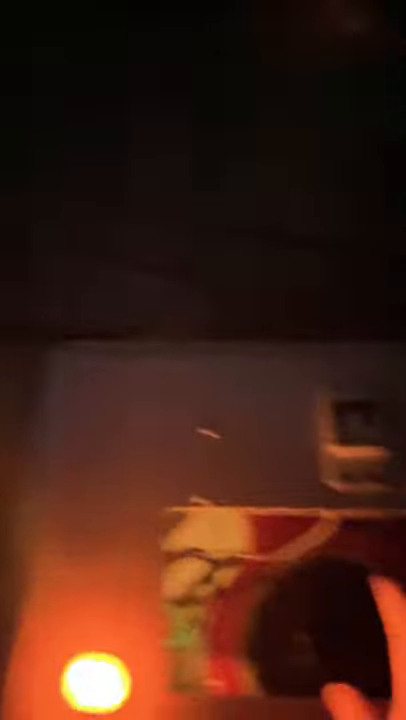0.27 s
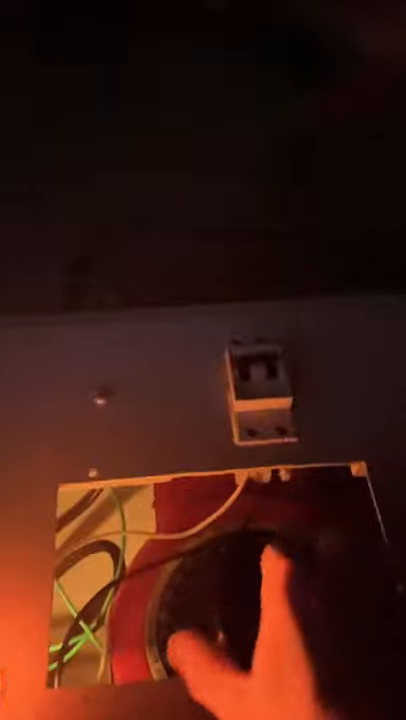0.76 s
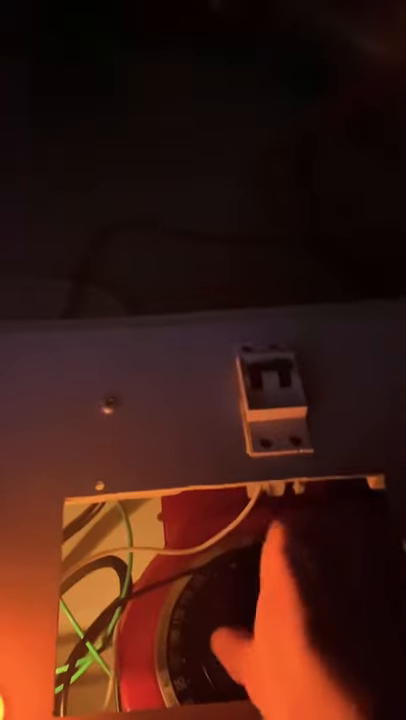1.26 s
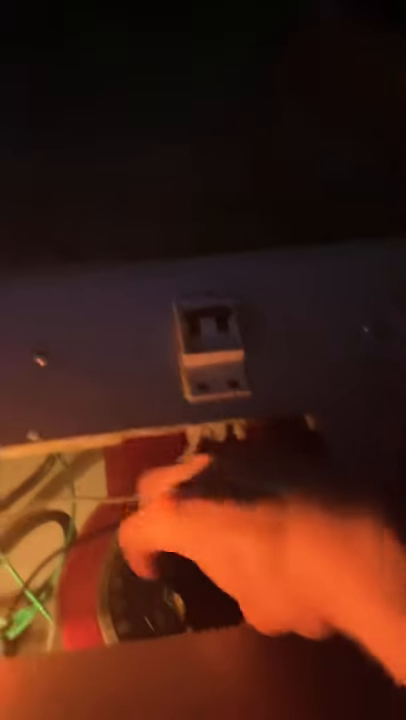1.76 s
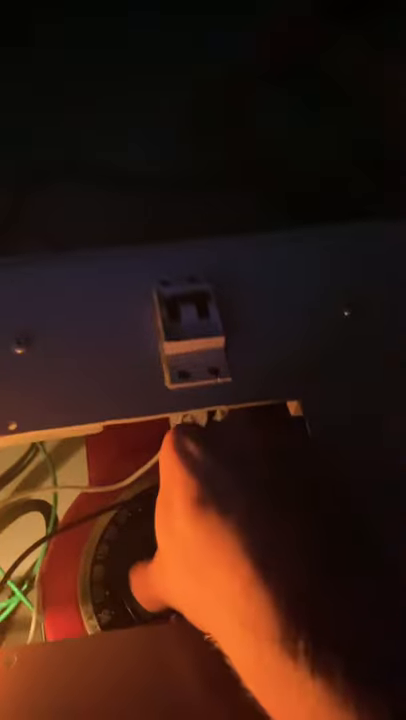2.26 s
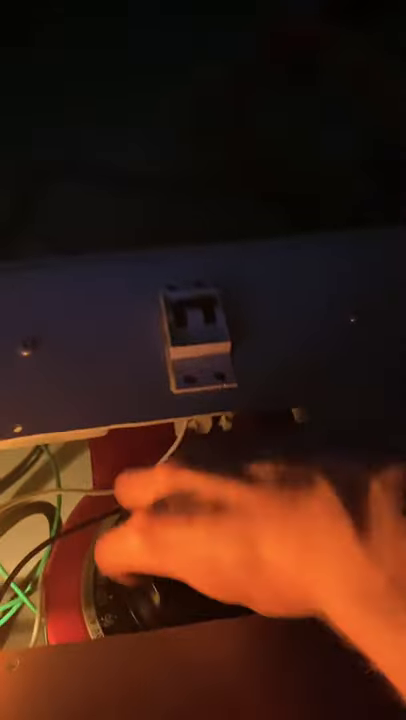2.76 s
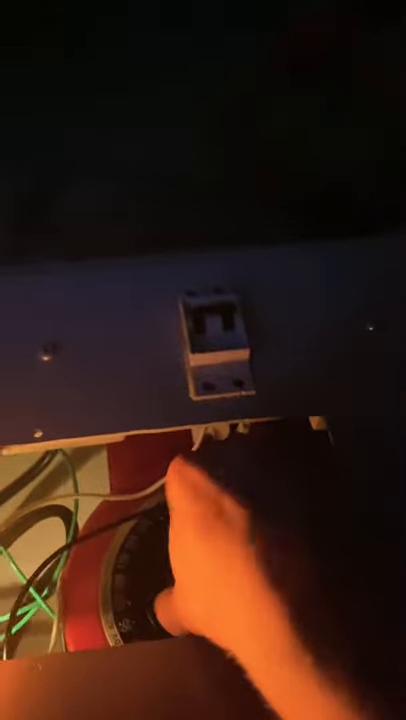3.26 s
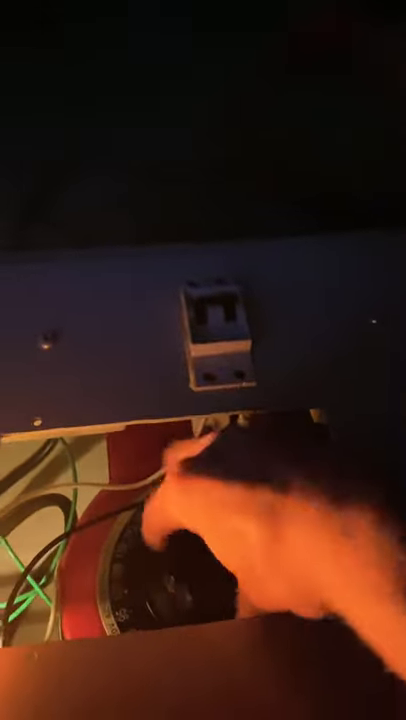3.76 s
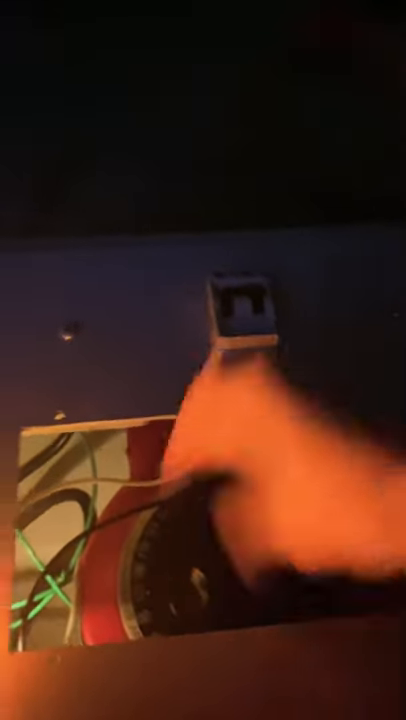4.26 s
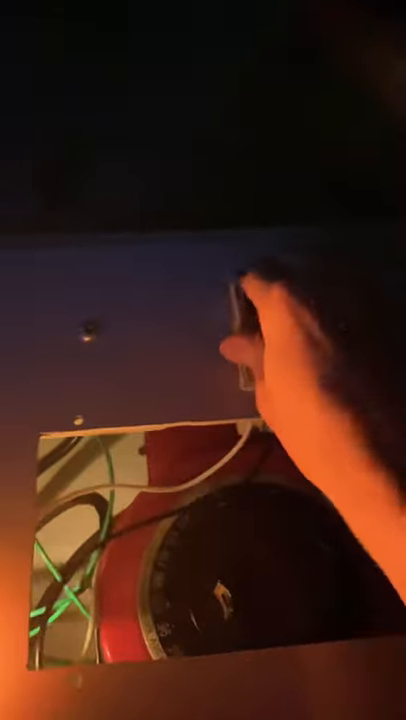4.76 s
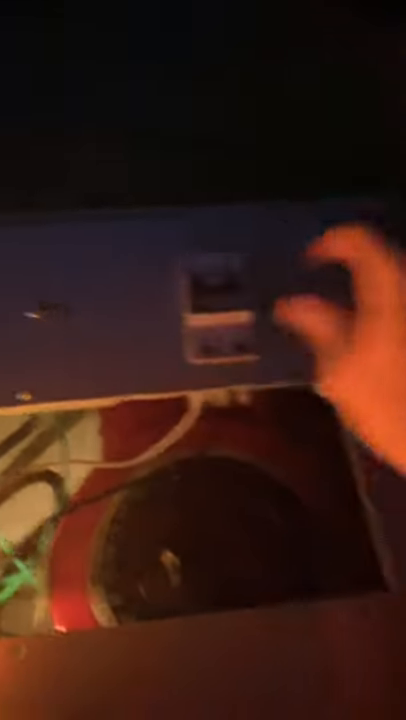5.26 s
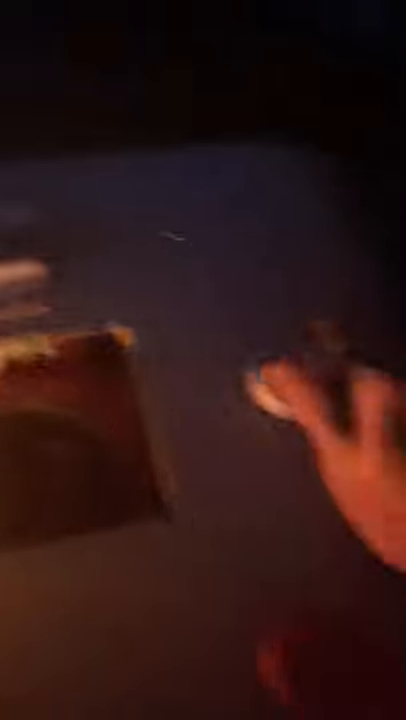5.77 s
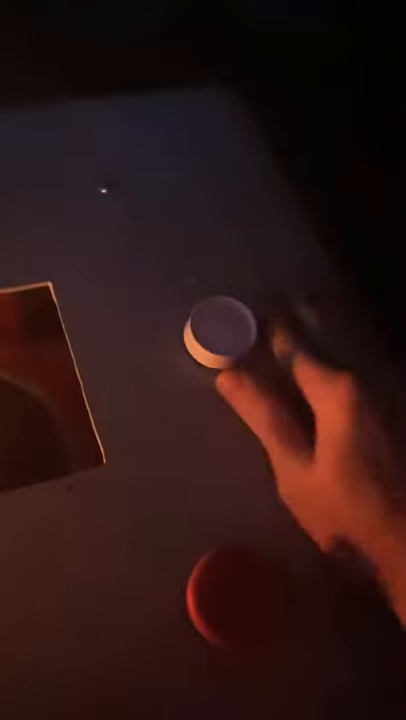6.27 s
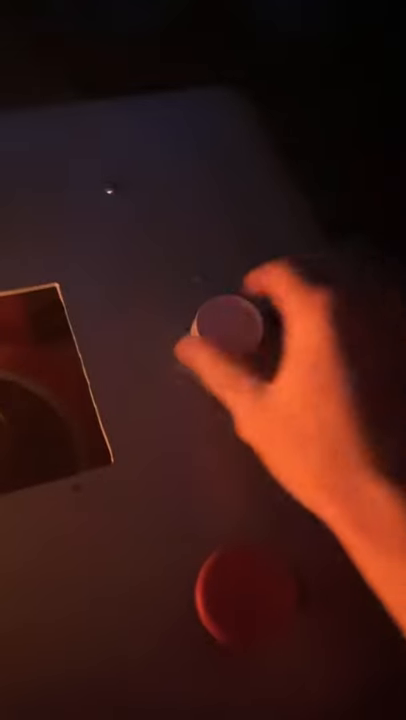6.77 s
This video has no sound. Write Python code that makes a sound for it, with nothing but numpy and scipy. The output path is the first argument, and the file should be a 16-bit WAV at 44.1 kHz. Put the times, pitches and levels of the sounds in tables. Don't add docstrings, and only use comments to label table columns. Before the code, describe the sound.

From 0 s a high-voltage spark gap across a walled night yard roars in a dense, harsh, bright buzz, roughly three hundred ragged cracks a second, with a ringing, lumpy outdoor reverberation. From about 1.3 s it slows, and by 2.4 s it is a coarse mains-rate rattle. Between 2.6 and 3.3 s separate cracks emerge, growing harder and more widely spaced, the loudest last ones near 3.5 s; a faint low fizzle ends it at 3.74 s. The tail dies away, uncovering a much quieter cooling blower, a steady mid-low whine with rushing air, and faint distant wash. A bright plastic click comes at 3.9 s, a soft touch at 4.75 s, a sharp breaker snap at 4.9 s. At 6.2 s a dull button click cuts the blower: its pitch and hiss sink, with soft box knocks at 6.46 and 6.75 s and a faint low shudder.

```python
import sys
import numpy as np
from scipy import signal
from scipy.fft import rfft, irfft, next_fast_len
from scipy.io import wavfile
from scipy.ndimage import uniform_filter1d

SR = 44100
rng = np.random.default_rng(int(sys.argv[2]) if len(sys.argv) > 2 else 0)


def voltage_ratio(level):
    return 10 ** (np.asarray(level, float) / 20)


def generate_wav(sig):
    pcm = np.round(np.clip(np.atleast_2d(sig).T, -1, 1) * 32767).astype(np.int16)
    wavfile.write(sys.argv[1], SR, pcm)


N = 309141
TIME_S = np.arange(N) / SR
HZ = np.fft.rfftfreq(next_fast_len(N + 8000), 1 / SR)
PORT_SIGN = np.array([[1], [-1]])
# freq_hz, likeness
YARD_LIKENESS = [(120, .3), (300, .7), (500, .7), (900, -.5), (1900, .9), (3000, 0), (5000, .4),
                 (5900, .55), (6400, .93), (6900, .98), (8100, .97), (9000, .3), (9700, .97), (11300, .97),
                 (11900, .55), (12500, .92), (13000, .985), (14400, .985), (15000, .4), (15600, .9)]


def evened(x):
    return x / np.sqrt(np.mean(x ** 2) + 1e-20)


def read(points, hz):
    f, value = np.transpose(points)
    return np.interp(np.log(hz + 1), np.log(f + 1), value)


def curves(rows):
    s, *columns = np.transpose(rows)
    return [np.interp(TIME_S, s, c) for c in columns]


def humps(rows, hz):
    return sum(db / (1 + (2 * (hz - f) / width_hz) ** 2) for f, width_hz, db in rows)


def spectrum(x):
    return rfft(x, 2 * len(HZ) - 2)


def filtered(x, gain):
    return irfft(spectrum(x) * gain)[..., :N]


def lowpass(corner_hz, order):
    return 1 / (1 + (HZ / corner_hz) ** order)


def highpass(corner_hz, order):
    return 1 / (1 + (corner_hz / (HZ + 1)) ** order)


def delay(s):
    return np.exp(-2j * np.pi * HZ * s)


def pair(noise):
    same = np.clip(read(YARD_LIKENESS, HZ), 0, 1)
    right = filtered(noise[0], same) + filtered(noise[1], np.sqrt(1 - same ** 2))
    return np.array([noise[0], right])


def held(recover_s):
    quiet_from_s = 3.5
    return np.exp(-(np.clip(TIME_S - quiet_from_s, 0, None) / recover_s) ** 2)


def firings():
    # time_s, firings_per_s, crack_db
    buzz = [(0, 297, -24), (.12, 325, -25.5), (.5, 306, -26), (1, 304, -26), (1.15, 280, -25),
            (1.3, 270, -26.5), (1.6, 260, -28), (2, 238, -28), (2.3, 195, -26), (2.415, 168, -25.5)]
    # time_s, crack_db
    thinning = [(2.4247, -25), (2.435, -24), (2.4431, -24), (2.453, -24.5), (2.4663, -26.5), (2.4769, -25),
                (2.4839, -26), (2.4926, -27.5), (2.5036, -26), (2.5164, -25), (2.5274, -24.5),
                (2.5348, -28), (2.5428, -26.5), (2.5501, -26), (2.5584, -26.5), (2.5668, -26.5),
                (2.5833, -24.5), (2.5999, -25.5)]
    # time_s, crack_db
    singles = [(2.6101, -27), (2.6248, -24.5), (2.6422, -24), (2.6589, -27), (2.6677, -26), (2.678, -27),
               (2.6914, -26), (2.6953, -27), (2.7096, -25), (2.7248, -28.5), (2.7288, -28), (2.7407, -24.5),
               (2.7444, -26), (2.7583, -27), (2.7681, -25.5), (2.7852, -22.5), (2.8022, -23.5),
               (2.8187, -23.5), (2.8334, -23), (2.8513, -22.5), (2.8676, -26), (2.8852, -23.5),
               (2.9006, -24.5), (2.9104, -26.5), (2.9336, -24), (2.9438, -24.5), (2.9606, -25.5),
               (2.9758, -24), (2.9854, -29), (3.0, -26.5), (3.0096, -30), (3.0267, -23), (3.0421, -24),
               (3.0518, -26), (3.0673, -24.5), (3.0842, -24), (3.0941, -26), (3.1106, -23), (3.125, -23.5),
               (3.1431, -22), (3.1587, -25), (3.1757, -23), (3.1944, -23), (3.2092, -24.5), (3.2269, -21),
               (3.2418, -22.5), (3.2584, -22.5), (3.2686, -23.5), (3.2994, -18.5), (3.3189, -21),
               (3.3498, -19), (3.3834, -20), (3.3931, -25), (3.4104, -20.5), (3.4502, -17), (3.4611, -20.5),
               (3.5008, -16.8), (3.5358, -16.4), (3.5855, -15.5)]
    # time_s, crack_db
    restrikes = [
        (3.3026, -24),
        (3.353, -23),
    ]
    # time_s, level_db
    thump_swell = [(2.42, -5.5), (2.6, -2.5), (2.85, -3), (2.95, 1), (3.2, 0.5), (3.6, -1)]
    mains_peaks_per_s, charge_start, charge_share = 119.96, -.25, .6
    gap_scatter = .25
    full_per_s, full_thump_db, thump_db_per_halving = 280, 1, 7
    single_trim_db, single_thump_db, thump_growth = -0.34, -4.5, 0.65

    per_s, crack_db = curves(buzz)
    thump_db = crack_db + full_thump_db + thump_db_per_halving * np.log2(full_per_s / per_s)
    phase = (TIME_S * mains_peaks_per_s - charge_start) % 1
    charging = np.sin(np.pi * np.clip(phase / charge_share, 0, 1)) * np.pi / 2 / charge_share
    charge = np.cumsum(per_s * charging) / SR
    breakdown, scatter = rng.standard_normal((1200, 2)).T
    at = np.searchsorted(charge, np.cumsum(np.clip(1 + gap_scatter * breakdown, .3, 2)))
    keep = at < buzz[-1][0] * SR
    at, size_db = at[keep], (scatter + 1.55 * breakdown)[keep]
    cracks, thumps = np.zeros((2, N))
    cracks[at] = voltage_ratio(crack_db[at] + size_db)
    thumps[at] = voltage_ratio(thump_db[at] + 3.3 * size_db)

    s, db = np.vstack([thinning, singles, restrikes]).T
    single = np.round(s * SR).astype(int)
    swell_db = curves(thump_swell)[0][single]
    cracks[single] = voltage_ratio(db + single_trim_db)
    thumps[single] = voltage_ratio(single_thump_db + thump_growth * (db + 19.5) + swell_db)
    return cracks, thumps


def sparks():
    # freq_hz, level_db_per_hz
    crack_spectrum = [(100, -63), (320, -8), (640, -11.5), (1200, -8), (2000, -8.5), (3400, -7.5),
                      (4800, -2.5), (7000, 3.5), (8200, 7.5), (10500, -3.5), (12000, -0.5), (13700, 7.5),
                      (15600, 2)]
    # freq_hz, width_hz, level_db
    gap_rings = [(9100, 330, -5.5), (9430, 120, 2.5), (10170, 470, 3.5), (12170, 300, 6.5),
                 (13700, 770, -4.5), (15500, 500, 0)]
    # freq_hz, level_db_per_hz
    thump_spectrum = [(25, -25), (45, -0.5), (80, 1), (160, -1), (320, -4), (640, -11), (1300, -4.5),
                      (2500, -16.5)]
    fizzle_s, fizzle_db = 3.7415, -17

    cracks, thumps = firings()
    t = np.arange(300) / SR
    shape = np.clip(t / 0.00025, 0, 1) * np.exp(-(t / 0.0016) ** 1.4) + 0.49 * np.exp(-t / 0.0039)
    envelope = np.sqrt(signal.oaconvolve(cracks ** 2, shape ** 2)[:N].clip(0))
    ragged = envelope * np.sign(rng.standard_normal(N))
    colour = evened(voltage_ratio(read(crack_spectrum, HZ) + humps(gap_rings, HZ)))
    fizzle = voltage_ratio(fizzle_db) * delay(fizzle_s) * lowpass(300, 4)
    pushes = irfft((spectrum(thumps) + fizzle) * voltage_ratio(read(thump_spectrum, HZ)))[:N]
    return filtered(ragged, colour) + pushes


def yard(x, wet_db, near_db, count):
    # freq_hz, t60_s
    yard_t60 = [(150, .34), (400, .26), (1000, .5), (1900, .64), (2700, .68), (3900, .66), (4750, .52),
                (5600, .6), (7000, .55), (12000, .36)]
    # freq_hz, level_db
    yard_colour = [(100, -37), (300, -13.5), (800, 0.5), (1500, 0), (3000, 9), (6000, 1.5), (9000, 2.5),
                   (12000, 4.5), (15000, -0.5)]
    # freq_hz, width_hz, level_db
    yard_rings = [(441.6, 280, 14.5), (940, 89.2, 8.5), (1476, 150, 9.5), (2079, 200, 11), (2683, 330, 9.5),
                  (3910, 230, -5), (4070, 190, 4.5), (4745, 230, 9.5), (5290, 480, 3), (5700, 280, 5.5)]
    # freq_hz, width_hz, level_db
    yard_lines = [(404, 60, 3), (915, 40, 3), (1142, 40, 4), (1558, 50, 3), (2055, 30, 2), (2153, 35, 4),
                  (2562, 30, 2), (2659, 45, 2), (4225, 40, 4), (4658, 40, 2), (4977, 30, 2), (5275, 40, 3),
                  (5699, 40, 2), (5904, 40, 3), (8940, 40, 3), (9749, 40, 4)]
    # delay_s, level_db
    wall_echoes = [
        (0.0127, -10),
        (0.0216, -20),
    ]
    size, lead_in = 36096, 14700

    lumps_db = 2.2 * evened(uniform_filter1d(rng.standard_normal((count, 1, size)), 70))
    hz, t, z = signal.stft(rng.standard_normal((count, 2, size)) * voltage_ratio(lumps_db), SR, nperseg=768)
    t60, same = read(yard_t60, hz)[:, None], read(YARD_LIKENESS, hz)[:, None]
    z[:, 1] = same * z[:, 0] + np.sqrt(1 - same ** 2) * z[:, 1]
    colour_db = read(yard_colour, hz) + humps(yard_rings, hz)
    z *= voltage_ratio(-60 * t / t60 + colour_db[:, None]) * np.sqrt(2 * np.log(1000) / t60 / SR)
    onset = np.clip(np.arange(size) / SR / 0.00076, 0, 1)
    tails = signal.istft(z, SR, nperseg=768)[1][..., :size] * onset

    drift_rate = 1.31 ** np.arange(count)[:, None]
    drift = np.cos(np.pi * (TIME_S / 1.27 * drift_rate + rng.random((count, 1))))
    turns = drift / np.linalg.norm(drift, axis=0) if count > 1 else np.ones((1, N))
    lines = 1 + sum((voltage_ratio(db) - 1) / (1 + 2j * (HZ - f) / w) for f, w, db in yard_lines)
    rung = turns * filtered(x, lines)
    fed = np.concatenate([rung[:, :lead_in], rung], axis=1)
    wet = signal.fftconvolve(fed[:, None], tails, axes=2)[..., lead_in:N + lead_in].sum(0)

    walls = sum(voltage_ratio(db) * delay(s) for s, db in wall_echoes) * highpass(6000, 2)
    near = rng.standard_normal((2, 80)) * np.hanning(80) / 5.5
    scattered = voltage_ratio(near_db) * spectrum(near) * highpass(2500, 4)
    return filtered(x, 1 + walls + scattered) + voltage_ratio(wet_db) * wet


def waver():
    return voltage_ratio(1.24 * evened(uniform_filter1d(rng.standard_normal(N), 1500)))


def blower():
    # multiple_of_shaft_speed, level_db
    orders = [(2, -13), (4, -12.5), (5, -10), (6.63, -26.5), (7, -8), (9, -7), (10, -7.5), (12, -0.5),
              (15, -10), (15.35, -14.5), (18, -5), (24, -6), (24.7, -11.5), (25, -12), (26, -23.5),
              (30, -8), (32.1, -17.5), (35, -23), (43, -16), (45, -17), (46, -15), (49, -20.5), (51, -13.5),
              (54, -24.5), (57, -25), (60, -16.5)]
    # freq_hz, width_hz, level_db
    housing = [(440, 31, -5.5), (320, 60, 2.5), (520, 40, -0.5), (610, 82, 8), (798, 40, 6),
               (835, 30, -7.5), (870, 40, 4.5), (930, 120, 11), (1010, 28, -7.5)]
    # freq_hz, level_db_per_hz
    rush_spectrum = [(60, -20.5), (160, -19.5), (320, -3), (640, 0.5), (1200, -1), (2000, -3.5),
                     (3200, 1.5), (4800, -4.5), (7000, -22), (9500, -16), (12000, -27), (14000, -33)]
    # freq_hz, width_hz, level_db
    rush_rings = [(1420, 280, 5), (2120, 390, 7), (2960, 200, -3), (4200, 180, 2), (4580, 200, -5)]
    full_blade_hz, off_s, coast_lag_s, coast_s = 526.7, 6.21, 0.01, 1.12
    tone_start_db, over_start_db, rush_start_db = -68.5, -78, -68.5
    tone_held_db, over_held_db, rush_held_db = -9.5, -2.5, -3.5
    tone_law, over_law, rush_law, hiss_law = 4.7, 5.4, 3.6, 1.3
    phone_turn_s, phone_turn_length_s, phone_turn_db = 4.85, 0.13, 3

    since = np.clip(TIME_S - off_s, 0, None)
    speed = np.exp(-(since - coast_lag_s * (1 - np.exp(-since / coast_lag_s))) / coast_s)
    speed_db = 20 * np.log10(speed)
    blade_hz = full_blade_hz * speed
    turns = np.cumsum(blade_hz) / SR / 6
    cut = held(recover_s=0.64)

    tone_db = tone_start_db + tone_law * speed_db + tone_held_db * cut + humps(housing, blade_hz)
    tones = voltage_ratio(tone_db) * np.sin(2 * np.pi * 6 * turns) * waver() ** .4
    swung = .5 + .5 * np.tanh((TIME_S - phone_turn_s) / phone_turn_length_s)
    over_db = over_start_db + phone_turn_db * swung + over_law * speed_db + over_held_db * cut
    for order, db in orders:
        side_order = 0 if order in (9, 12) else max(order - 12, 3)
        slowing_db = -9 * side_order * (1 - speed)
        colour_db = humps(housing, order * blade_hz / 6) - humps(housing, order * full_blade_hz / 6)
        level = voltage_ratio(over_db + db + slowing_db + colour_db) * waver()
        tones += level * np.sin(2 * np.pi * (order * turns + rng.random()))
    turned = signal.hilbert(tones, next_fast_len(N)).imag[:N]
    tones = np.sqrt(2) * (tones * voltage_ratio(-PORT_SIGN) + 0.26 * turned * PORT_SIGN)

    throb = 1 + 0.24 * np.sin(2 * np.pi * 6 * turns) + 0.096 * np.sin(2 * np.pi * 3 * turns)
    rush_gain = voltage_ratio(read(rush_spectrum, HZ) + humps(rush_rings, HZ))
    rush = evened(pair(filtered(rng.standard_normal((2, N)) * throb, rush_gain)))
    rush = rush - (1 - speed ** hiss_law) * filtered(rush, highpass(2600, 4))
    return tones + voltage_ratio(rush_start_db + rush_law * speed_db + rush_held_db * cut) * rush


def night():
    # freq_hz, level_db_per_hz
    night_spectrum = [(40, -1.5), (80, 2.5), (160, -6.5), (320, -7.5), (640, -2), (1200, -8), (2000, -13),
                      (3200, -38.5), (4800, -24), (7000, -31.5), (9500, -43), (12000, -40), (14000, -36.5),
                      (15600, -34.5)]
    wash = evened(pair(filtered(rng.standard_normal((2, N)), voltage_ratio(read(night_spectrum, HZ)))))
    return voltage_ratio(-77 - 10.5 * held(recover_s=1.286)) * wash


def clicks(rows, modes, dull):
    out, t = np.zeros(N), np.arange(8000) / SR
    for s, ring_db, snap_db, snap_t60, knock_db in rows:
        rattle = signal.lfilter([1, -.3], [1, -dull], rng.standard_normal(len(t)))
        sound = voltage_ratio(snap_db - 60 * t / snap_t60) * rattle
        for hz, db, t60 in modes:
            level_db = ring_db + db + knock_db * (hz < 1300) - 60 * t / t60
            sound += voltage_ratio(level_db) * np.sin(2 * np.pi * hz * rng.uniform(1.0, 1.02) * t)
        part = out[round(s * SR):][:len(t)]
        part += (sound * np.clip(t / 0.000067, 0, 1))[:len(part)]
    return filtered(out, highpass(110, 6))


def knob():
    # start_s, ring_db, snap_db, snap_t60_s, low_knock_db
    knob_clicks = [
        (3.9128, -42, -56, 0.03, -10),
        (3.9172, -53, -56, .03, -9),
    ]
    # freq_hz, level_db, t60_s
    knob_modes = [(190, -14, .06), (1540, -15, .05), (2300, -4, .025), (4721, -15, .02), (5300, 2, .016),
                  (5480, 1, .014), (8600, -10, .012), (9523, -14, .02), (10060, -8, .035), (14500, -8, .02)]
    return clicks(knob_clicks, knob_modes, dull=.02)


def fingertip():
    # start_s, ring_db, snap_db, snap_t60_s, low_knock_db
    touches = [
        (4.752, -96, -69, 0.023, 18.4),
        (6.462, -100, -67, 0.024, 6.9),
        (6.742, -87, -70.5, 0.079, 14),
        (6.765, -86, -73, 0.092, 17),
    ]
    # freq_hz, level_db, t60_s
    lid_modes = [(177, -13, .1), (230, 4, 0.12), (610, -13, .05), (1260, -19, .03)]
    return filtered(clicks(touches, lid_modes, dull=0.89), lowpass(4500, 3))


def breaker():
    # start_s, ring_db, snap_db, snap_t60_s, low_knock_db
    breaker_clicks = [
        (4.9045, -56, -36, 0.023, -31),
        (4.9062, -26.5, -31.5, 0.018, -13.5),
        (4.9085, -38.5, -32, 0.067, -8),
    ]
    # freq_hz, level_db, t60_s
    breaker_modes = [(178, 0, .13), (285, -3, .08), (520, -14, .04), (1050, -6, .03), (1620, -10, .02),
                     (3250, -14, .014), (4250, -14, .012), (6266, 2, .014), (7600, -3, .012),
                     (9970, -10, .015)]
    return clicks(breaker_clicks, breaker_modes, dull=0.28)


def button():
    # start_s, ring_db, snap_db, snap_t60_s, low_knock_db
    button_clicks = [
        (6.2125, -60.5, -60, 0.03, -14),
    ]
    # freq_hz, level_db, t60_s
    button_modes = [(190, -10, .06), (1506, 0, .03), (2600, 1, 0.041), (4020, 1, .025), (6200, -6, .015)]
    return filtered(clicks(button_clicks, button_modes, dull=0.3), lowpass(12000, 4))


def low_drone():
    drone_hz, width_hz, level_db = 58, 5, -82
    center_s, length_s = 6.65, .3
    drone = filtered(rng.standard_normal(N), 1 / (1 + (2 * (HZ - drone_hz) / width_hz) ** 2))
    return voltage_ratio(level_db) * evened(drone) * np.exp(-((TIME_S - center_s) / length_s) ** 4)


def scene():
    coil = yard(sparks(), wet_db=-3.2, near_db=-16, count=4)
    switches = knob() + fingertip() + breaker() + button()
    return coil + blower() + night() + yard(switches, wet_db=-22, near_db=-9, count=1) + low_drone()


def sunken(bands):
    return voltage_ratio(-10 * sum(1 / (1 + ((2 * HZ - lo - hi) / (hi - lo)) ** 20) for lo, hi in bands))


def roll_off(x):
    return signal.sosfilt(signal.butter(12, 17100, fs=SR, output="sos"), x)


def record(dry):
    port_hz = [0, 3500, 5300, 6000, 6550, 8200, 8600, 9650, 11500, 12200, 12600, 14400, 15100, 15500, 22050]
    port_lead_rad = [0, .2, .6, 1.8, 2.95, 3.3, 4.3, 6.2, 6.4, 8.1, 9.35, 9.5, 10.9, 12.3, 14]
    # low_hz, high_hz
    mid_dips = [(6900, 7540), (13080, 14120)]
    # low_hz, high_hz
    side_dips = [(9700, 10950)]

    lag = np.exp(-2j * np.pi * 1.2 * np.log((HZ + 12) / 20000))
    edge = lowpass(15730, 600)
    bass_tilt = voltage_ratio(-.4 * lowpass(600, 2) * PORT_SIGN)
    lead = np.exp(.5j * np.interp(HZ, port_hz, port_lead_rad) * PORT_SIGN)
    left, right = filtered(dry, lag * edge * bass_tilt * lead)
    mid = filtered(left + right, sunken(mid_dips)) / 2
    side = filtered(left - right, sunken(side_dips) * highpass(55, 2.5)) / 2
    return roll_off(mid + side * PORT_SIGN)


dry = scene()
out = record(dry)
generate_wav(out)
```